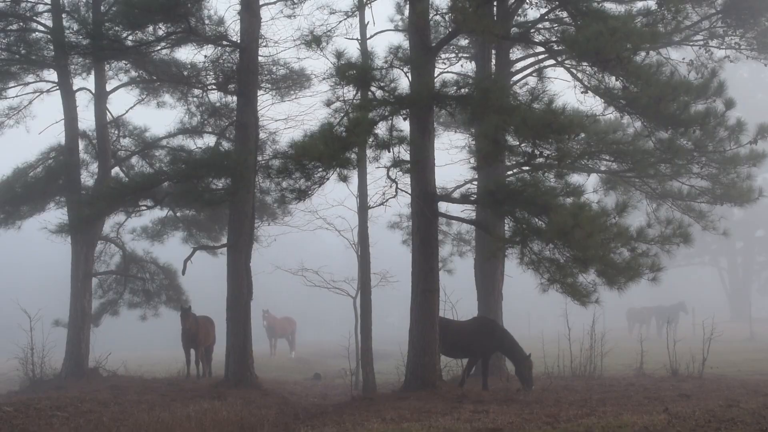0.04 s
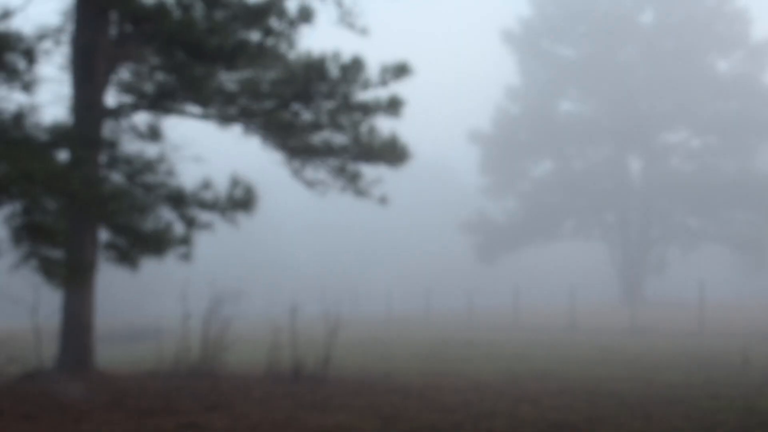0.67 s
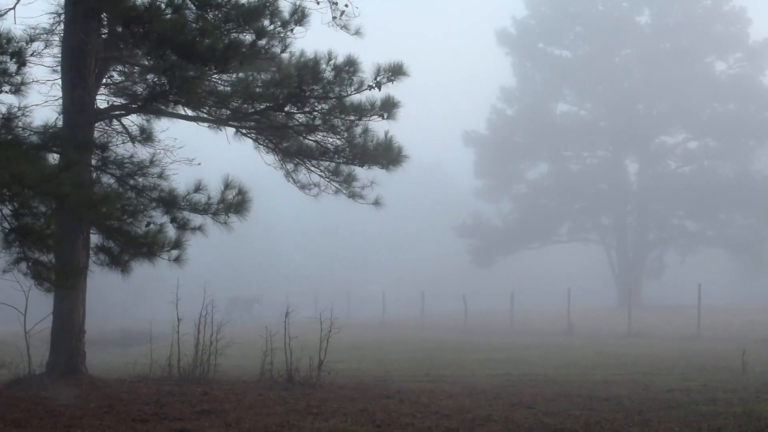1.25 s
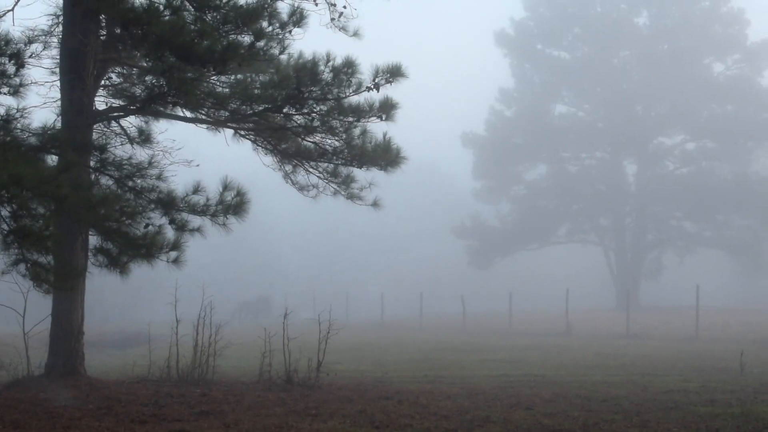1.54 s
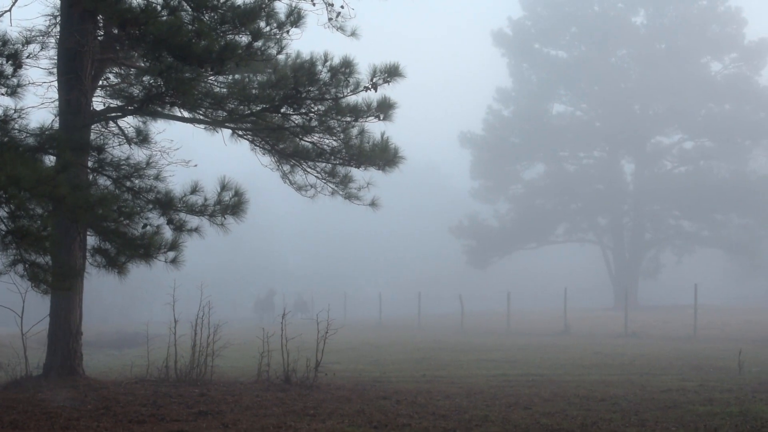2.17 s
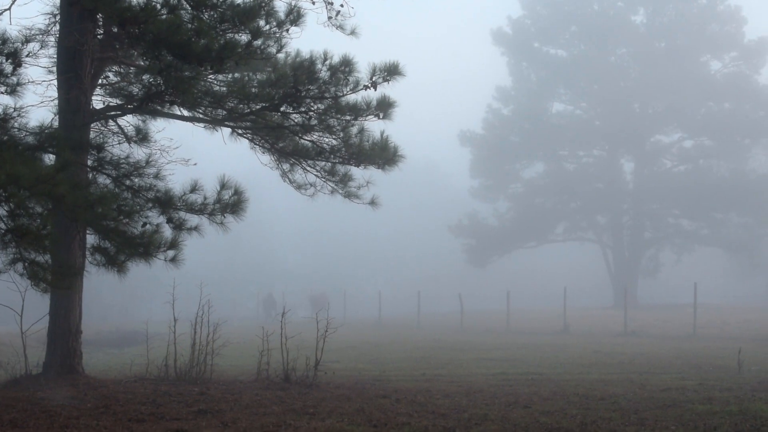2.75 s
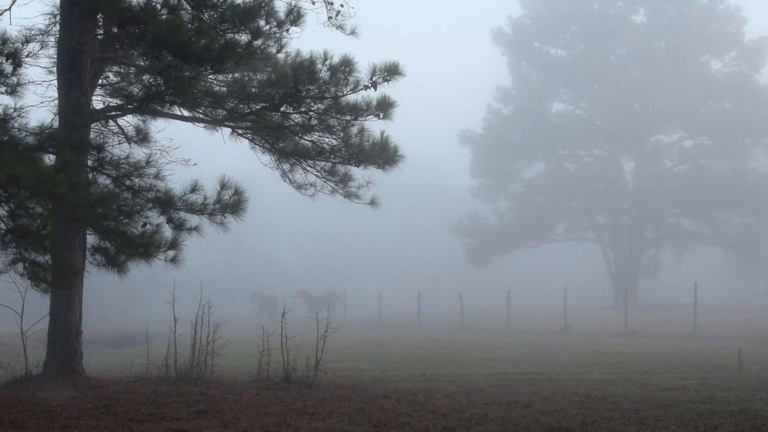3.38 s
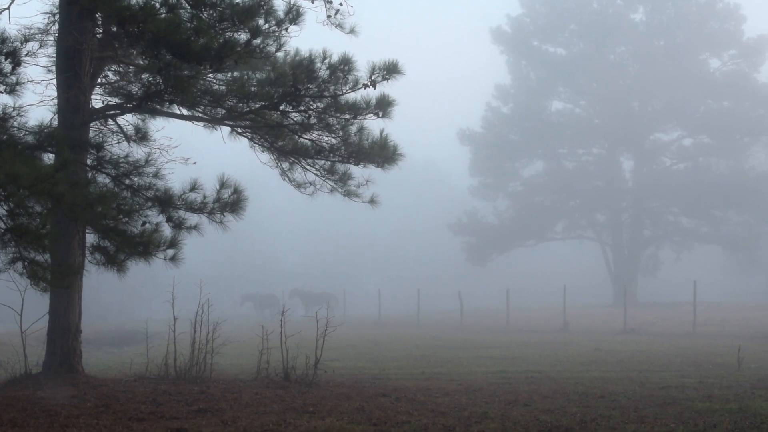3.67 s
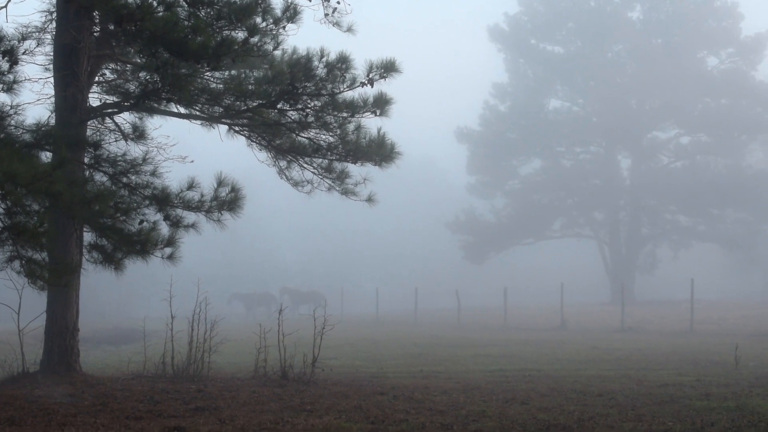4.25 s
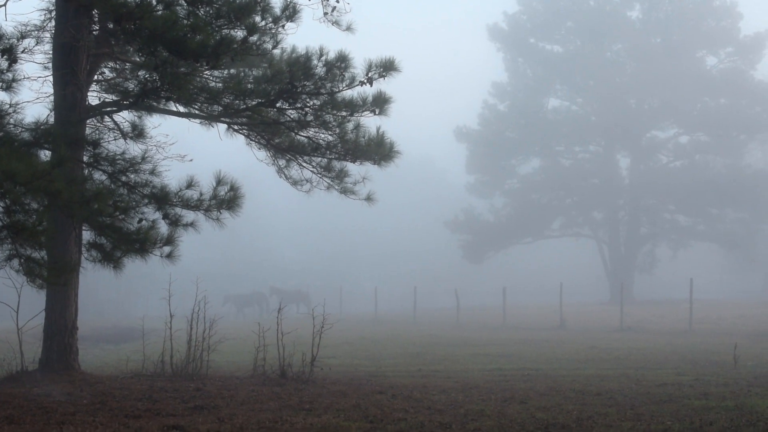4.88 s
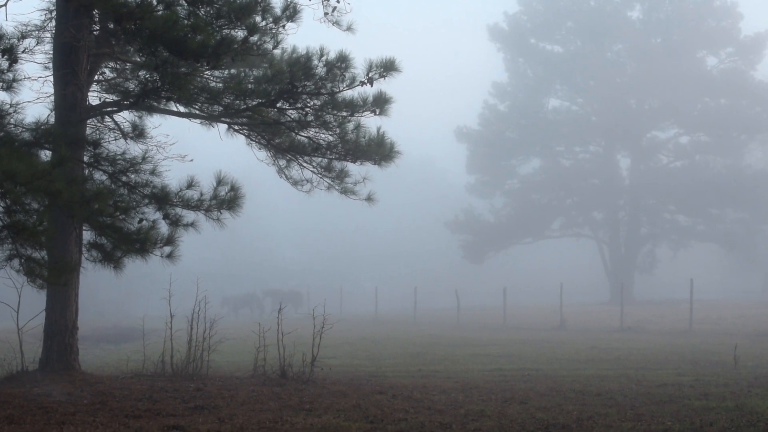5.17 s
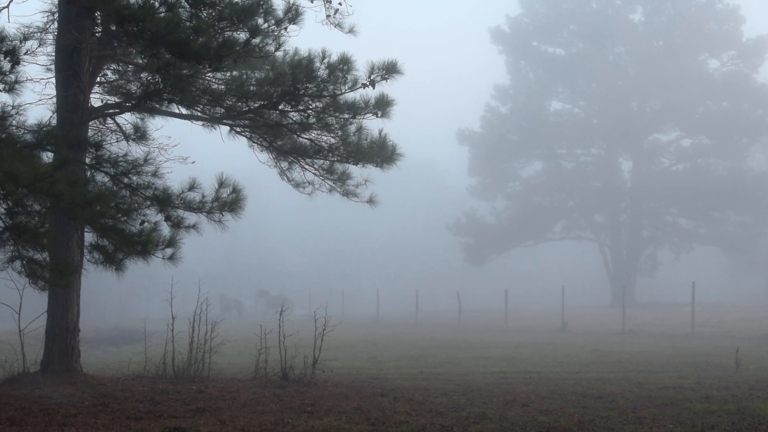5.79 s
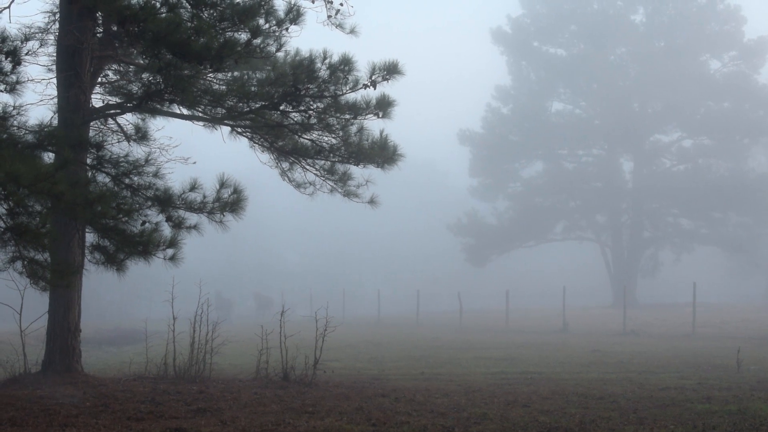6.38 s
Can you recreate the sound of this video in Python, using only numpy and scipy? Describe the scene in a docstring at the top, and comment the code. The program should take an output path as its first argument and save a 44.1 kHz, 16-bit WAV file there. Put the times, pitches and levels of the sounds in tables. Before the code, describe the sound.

In a quiet open field, faint distant birdsong and quick high chirps sound over a steady hush and low rumble. After a bump on the microphone the sound drops out for a moment, then returns with dull handling thumps, soft rustles and faint drip ticks. Then a rooster gives one hoarse four-note crow, the loudest sound, which echoes from the tree line as a faint hiss rises.

```python
"""A low rumble and an even hush lie over a foggy pasture; a songbird whistles far off, small birds chip near.
The camera body is bumped and rings low; at 0.6 s the sound cuts out and fades back in. Soft rustles and
fog drips follow. From 4.4 s a rooster crows, its syrinx pulsing through windpipe, throat and beak: two
short notes, a harsh one, then a held note that cracks to the octave below and sinks. The tree line
echoes it while a faint hiss rises."""
import sys
import numpy as np
from scipy import signal
from scipy.fft import rfft, irfft, next_fast_len
from scipy.io import wavfile
from scipy.ndimage import uniform_filter1d, map_coordinates

SR = 44100
rng = np.random.default_rng(int(sys.argv[2]) if len(sys.argv) > 2 else 0)


def digitize_waveform(pressure):
    """Quantize a signal to 16-bit integers and store it at the path in sys.argv[1].

    Rows of a 2-D input are taken as channels; values are limited to [-1, 1].
    """
    field = np.atleast_2d(pressure).T
    bounded = np.clip(field, -1, 1)
    quanta = np.round(bounded * 32767).astype(np.int16)
    wavfile.write(sys.argv[1], SR, quanta)


N = 283563

# notes of the crow: start t/s, end t/s, roughness of the first catch (0-1), hoarse from t/s,
# hoarseness (0-1), middle and top partials' level/dB relative to the effort
CROW_NOTES = [(4.361, 4.47, .6, 4.53, 0.4, -11.5, -31), (4.475, 4.614, 0.95, 4.46, 0.77, -10, -26.5),
              (4.707, 5.327, 0.06, 4.722, 1, -9.5, -19.5), (5.331, 5.942, 0.44, 5.74, 0.76, -7.5, -19)]


def amp(db):
    """Decibels to amplitude ratio."""
    return 10 ** (np.asarray(db) / 20)


def unit(x):
    """Normalisation to rms 1."""
    return x / np.sqrt(np.mean(x ** 2) + 1e-20)


def steady(x, size):
    """Division by the running rms flattens the envelope."""
    power = uniform_filter1d(uniform_filter1d(x ** 2, size), size)
    return x / np.sqrt(np.abs(power) + 1e-12)


def along(points, hz):
    """Interpolation of (f/Hz, value) points on a log frequency axis."""
    f, v = np.transpose(points)
    return np.interp(np.log(hz + 1), np.log(f + 1), v)


def curve(points):
    """Linear interpolation of (t/s, value) points at every sample."""
    return np.interp(np.arange(N) / SR, *np.transpose(points))


def ramp(start, length):
    """Linear rise from 0 to 1 over length seconds."""
    return np.clip((np.arange(N) / SR - start) / length, 0, 1)


def decay(start, life):
    """1 until start, then exponential decay with a time constant of life seconds."""
    return np.exp(-np.maximum(np.arange(N) / SR - start, 0) / life)


def wobble(rate):
    """Smooth random modulation, rate knots a second."""
    return map_coordinates(rng.standard_normal(N // 8), [np.arange(N) * rate / SR], mode="wrap")


def add(track, s, x):
    """Superposition of x on the track at time s."""
    part = track[max(round(s * SR), 0):][:len(x)]
    part += x[:len(part)]


def filtered(x, response):
    """Linear filtering: the spectrum times a frequency response."""
    m = next_fast_len(N + SR // 2)
    return irfft(rfft(x, m) * response(np.fft.rfftfreq(m, 1 / SR)), m)[:N]


def lowpass(x, hz, order):
    """Zero-phase roll-off above hz."""
    return filtered(x, lambda f: 1 / (1 + (f / hz) ** order))


def coloured(x, points):
    """Spectral shaping by (f/Hz, level/dB) points."""
    return filtered(x, lambda hz: amp(along(points, hz)))


def noise(spectrum):
    """Spectrally shaped Gaussian noise of rms 1."""
    return unit(coloured(rng.standard_normal(N), spectrum))


def scatter(x, t60):
    """Multiple scattering by trunks and foliage smears x into a dense exponential tail."""
    t = np.arange(SR) / SR
    tail = rng.standard_normal(SR) * amp(-60 * t / t60)
    return signal.fftconvolve(x, tail / np.linalg.norm(tail))[:N]


CUT_S = 0.6134  # the sound cuts out here; the rumble is weaker before it


def countryside():
    """Broadband noise, slowly modulated: a far rumble and the field's hush; a high hiss rises late."""
    # spectra of the rumble and of the open field: f/Hz, relative level/dB
    rumble_spectrum = [(15, -24), (40, -9), (52, -8), (64, 1), (88, 0), (104, -5), (135, -5), (170, -14),
                       (300, -21), (700, -60)]
    field_spectrum = [(88, -32), (150, -2), (285, -3.5), (436, -4), (1400, -11), (2270, -11.5),
                      (3280, -15.5), (5760, -21.5), (6860, -23), (8010, -25), (15500, -37)]
    rumble_db = np.where(np.arange(N) / SR < CUT_S, -57.5, -54.5)
    rumble = noise(rumble_spectrum) * amp(rumble_db + 0.33 * wobble(5.38))
    hush = noise(field_spectrum) * amp(-57.5 + 1.1 * wobble(3.69))
    hiss = noise([(3000, -10), (9000, 4), (14000, -3), (16000, -17)])
    return rumble + hush + amp(-70.5) * ramp(start=5.6, length=.3) * hiss


def whistles(notes, waver):
    """Frequency modulation: each pure tone glides through three pitches under a smooth swell."""
    track, unsteady = np.zeros(N), 1 + waver * wobble(180)
    for s, length, start, middle, end, db in notes:
        u = np.linspace(0, 1, int(length * SR))
        glide = np.polyval(np.polyfit([0, .5, 1], [start, middle, end], 2), u)
        hz = glide * np.roll(unsteady, -int(s * SR))[:len(u)]
        swell = np.sqrt(2 * np.abs(np.sin(np.pi * u)))
        add(track, s, amp(db) * swell * np.sin(2 * np.pi * np.cumsum(hz) / SR))
    return track


def twitter(start, end, centre_hz, db, count):
    """A random process of faint whistles from farther birds, log-normal in pitch."""
    when, length, level = rng.random((count, 3)).T
    spread = .1 * rng.standard_normal((count, 1)) + .07 * rng.standard_normal((count, 3))
    onsets = start + (end - start) * when
    notes = [onsets, 0.0288 + 0.062 * length, centre_hz * np.exp(spread), db - 6 * level]
    return whistles(np.column_stack(notes), waver=0.0343)


def far_birds():
    """At a distance, scattered song is nearly as strong as the direct sound."""
    # the songbird's clearest notes: t/s, length/s, f/Hz, glide as a share of f, level/dB
    song = [(0.032, 0.075, 4140, 0.16, -63), (.31, .08, 3000, -.25, -71), (1.751, 0.081, 2600, .3, -72),
            (1.834, .15, 2270, -0.1, -68), (1.959, 0.025, 2570, .1, -65), (1.996, 0.032, 3100, -0.22, -62),
            (2.088, 0.23, 2250, .02, -75), (2.3, 0.12, 2920, -.16, -68), (2.405, 0.035, 2410, 0.053, -62),
            (2.465, 0.16, 2660, -.13, -65.5), (2.975, 0.13, 3160, -.25, -59.5),
            (3.183, 0.033, 4000, 0.18, -63), (3.303, 0.034, 4270, -.13, -63.5),
            (3.326, 0.11, 2890, -0.24, -65.5), (3.9, 0.21, 2224, -.02, -65)]
    notes = [(s, length, hz * (1 - glide / 2), hz, hz * (1 + glide / 2), db)
             for s, length, hz, glide, db in song]
    direct = whistles(notes, waver=0.0283)
    direct += twitter(0, .45, centre_hz=3140, db=-66.5, count=10)
    direct += twitter(2.0, 4.15, centre_hz=2663, db=-65.5, count=40)
    return direct + amp(-1.5) * scatter(direct, t60=0.75)


def handling():
    """Impacts excite damped low modes of the camera body, with rubbing noise and one dry tick."""
    # bumps: t/s, level/dB, f/Hz, t60/s
    impacts = [(.484, -34, 133, .044), (1.111, -50, 308, 0.077), (1.393, -42, 126, 0.12),
               (1.455, -41.5, 106.5, 0.22), (1.598, -45, 101, 0.087), (1.896, -39, 133.6, 0.29),
               (2.011, -36, 169, 0.072), (2.031, -35, 113.6, .13), (2.263, -40, 93.4, .11),
               (3.438, -48, 135, 0.13), (6.196, -36.5, 108.6, .11)]
    # the tick: t/s, level/dB before shaping
    tick_bursts = [(0.4828, -31.5)]
    # its shaping: f/Hz, gain/dB
    tick_spectrum = [(300, -26), (1400, 3.5), (2300, -14), (3500, 2), (5200, -26), (11000, -28),
                     (16000, -47)]
    bumps, ticks, t = np.zeros(N), np.zeros(N), np.arange(SR // 3) / SR
    attack = 1 - np.exp(-t / 0.0019)
    for s, db, hz, t60 in impacts:
        add(bumps, s, amp(db - 60 * t / t60) * attack * np.sin(2 * np.pi * hz * t))
    rub = np.abs(bumps) * noise([(80, 10), (250, 2), (600, -20), (2000, -35), (8000, -74)])
    for s, db in tick_bursts:
        add(ticks, s, amp(db - 60 * t / 0.027) * rng.standard_normal(len(t)))
    return bumps + 0.69 * rub + coloured(ticks, tick_spectrum)


def near_birds():
    """Close to the source, the direct sound of each quick chip outweighs its scattering."""
    # chips: t/s, kind, length/s, level/dB
    chips = [(0.82, "fall", 0.02, -60.5), (1, "rise", 0.047, -68), (1.083, "rise", 0.028, -63.5),
             (1.219, "hook", 0.069, -56), (1.875, "snap", .011, -51), (2.069, "rise", 0.019, -60.5),
             (2.44, "hook", 0.035, -56), (2.568, "fall", 0.02, -63), (3.417, "rise", 0.016, -54),
             (3.473, "flick", 0.012, -53), (3.801, "snap", 0.0092, -44), (4.28, "rise", 0.038, -64),
             (4.656, "rise", .03, -63), (5.537, "snap", 0.0097, -41), (6.309, "rise", .04, -64.5),
             (6.316, "fall", .016, -64)]
    # glide of each kind: start, middle and end f/Hz
    glides = {"rise": (6300, 7550, 7800), "hook": (9700, 7400, 8500), "snap": (6900, 6750, 2600),
              "fall": (5850, 5100, 4000), "flick": (3300, 4200, 5760)}
    direct = whistles([(s, length, *glides[kind], db) for s, kind, length, db in chips], waver=0.0071)
    return direct + amp(-4.5) * scatter(direct, t60=0.28)


def rustles():
    """Amplitude modulation: low noise swells and sinks in half-sine arcs."""
    # swells: t/s, length/s, level/dB
    swells = [(1.071, 0.13, -56), (1.33, 0.36, -60.5), (3.278, 0.34, -56.5)]
    # rustle spectrum: f/Hz, relative level/dB
    spectrum = [(60, -14), (150, 2.5), (330, -2), (600, -32), (2000, -43)]
    return sum(amp(db) * np.sin(np.pi * ramp(s, length)) for s, length, db in swells) * noise(spectrum)


def drips():
    """Impact transients: fog dripping from the needles makes thin high ticks."""
    # single drops: t/s, level/dB before the high-pass
    drops = [(1.077, -51), (1.2007, -53), (1.3977, -51.5), (1.4356, -52), (5.0875, -44)]
    track, t = np.zeros(N), np.arange(SR // 50) / SR
    for s, db in drops:
        add(track, s, amp(db - 60 * t / .008) * rng.standard_normal(len(t)))
    return track - lowpass(track, 6500, order=4)


def voicing():
    """Nonlinear vibration: notes catch, then turn hoarse; hoarseness and the crack double the period."""
    clear_roughness, blend_s = .09, 0.014
    notes = np.array(CROW_NOTES)
    current = np.maximum(np.searchsorted(notes[:, 0], np.arange(N) / SR) - 1, 0)
    start, _, catch, hoarse_at, hoarseness, middle_db, top_db = notes[current].T
    rough = clear_roughness + catch * decay(start, .014) + hoarseness * (1 - decay(hoarse_at, .075))
    crack = ramp(start=5.555, length=0.017)
    doubling = np.clip(0.5 * rough + crack, 0, 1)
    return uniform_filter1d(np.array([rough, doubling, middle_db, top_db]), int(blend_s * SR))


def syrinx(pitch, rough, doubling, jitter, wander, shimmer, rasp):
    """A pulse train, irregular when rough; weakening every second pulse adds the octave below."""
    rough = np.clip(rough, 0, 1.3)
    unsteady = rough * (jitter * wobble(520) + wander * wobble(55)) + .0036 * wobble(160)
    phase = 2 * np.pi * np.cumsum(pitch * (1 + unsteady)) / SR
    pulses = unit(sum(np.cos(k * phase) / np.hypot(1, k / 7) for k in range(1, 23)))
    sizes = 1 + doubling * np.cos(phase / 2) + shimmer * rough * wobble(480)
    hiss = rng.standard_normal(N) * (1 + np.cos(phase))  # air escapes once a cycle
    return pulses * sizes + rasp * (rough + 0.2) * hiss


def windpipe(x, round_trip_s, reflection, dispersion):
    """Reflections along the windpipe ripple the overtones; dispersion draws each puff out in time."""
    def response(hz):
        ripple = 1 + reflection * np.clip(hz / 2000 - 1, 0, 1) * np.cos(2 * np.pi * hz * round_trip_s)
        return ripple * np.exp(-2j * np.pi * dispersion * np.sqrt(hz))
    return filtered(x, response)


def throat(x):
    """Formant filtering: throat and beak move between a strained and an open shape."""
    # responses of the two shapes: f/Hz, gain/dB
    strained = [(300, -42.5), (560, -10.5), (790, -16.5), (930, -17.5), (1130, -0.5), (1380, 3), (1560, -8),
                (1730, -16.5), (1970, 3.5), (2420, -30.5), (2770, -5.5), (3200, -17), (3650, 0),
                (4300, -12), (6500, -19.5), (7000, -31), (8700, -33), (15000, -48.5)]
    opened = [(300, -30.5), (720, -13), (900, -9.5), (1130, -6), (1370, 13.5), (1500, -7), (1650, -40),
              (2000, -28), (2230, -23.5), (2660, -3.5), (3050, -13.5), (3450, -32.5), (3850, -16.5),
              (5000, -32.5), (8500, -23), (15000, -61)]
    # throat opening: t/s, share (0 strained, 1 open)
    openings = [(4.37, 0.61), (4.52, 0.71), (4.60, .19), (4.72, .02), (5.31, 0.14), (5.36, .01),
                (5.43, 0.8), (5.76, 0.84), (5.9, 0.73)]
    opening = curve(openings)
    return (1 - opening) * coloured(x, strained) + opening * coloured(x, opened)


def rooster():
    """Source and filter: effort sets the level; a clear second partial blares at the beak's resonance."""
    # pitch of the two short notes, the harsh note and the held note: t/s, f/Hz
    short_pitch = [(4.365, 517), (4.39, 551), (4.462, 572), (4.492, 668.6), (4.54, 682.7), (4.59, 662.2)]
    harsh_pitch = [(4.719, 679), (4.731, 793.6), (4.755, 828.7), (4.785, 780), (4.812, 684.6), (4.872, 705),
                   (4.93, 780.3), (5.12, 747.8), (5.21, 686)]
    held_pitch = [(5.38, 663), (5.419, 677.3), (5.506, 683.8), (5.555, 712.4), (5.591, 750), (5.66, 763.4),
                  (5.83, 743), (5.9, 725.4), (5.955, 546)]
    # vocal effort: t/s, level/dB
    effort = [(4.365, -39.5), (4.4, -39), (4.52, -35), (4.6, -35.5), (4.73, -32.5), (4.81, -31.5),
              (4.85, -35.5), (4.97, -31), (5.12, -31.5), (5.3, -33.5), (5.37, -38.5), (5.44, -34),
              (5.58, -38), (5.76, -40), (5.93, -38)]
    beak_hz, beak_width_hz, beak_db = 1362.5, 23, 12.5
    attack_s, release_s, uneven_db = 0.015, 0.024, 2
    pitch = curve(short_pitch + harsh_pitch + held_pitch)
    rough, doubling, middle_db, top_db = voicing()
    pulses = syrinx(pitch, rough, doubling, jitter=.045, wander=.018, shimmer=.7, rasp=.55)
    voice = throat(windpipe(pulses, round_trip_s=.001125, reflection=.5, dispersion=.3))
    body = lowpass(voice, 2070, order=14)
    # short waves glance off grass and twigs, so overtones come unevenly
    upper = voice - body + .45 * scatter(voice - body, t60=.07)
    middle = lowpass(upper, 4580, order=16)
    top = upper - middle + scatter(upper - middle, t60=.1) * (1 + .8 * wobble(140))
    resonance = np.exp(-((2 * pitch - beak_hz) / beak_width_hz) ** 2)
    clarity = np.clip(1 - rough ** 2, 0, 1)
    bands = amp(beak_db * resonance * clarity) * steady(body, size=600)
    bands += amp(middle_db + uneven_db * wobble(22)) * steady(middle, size=600)
    bands += amp(top_db) * steady(top, size=600)
    envelopes = [ramp(start, attack_s) * decay(end, release_s) for start, end, *_ in CROW_NOTES]
    return np.max(envelopes, axis=0) * amp(curve(effort)) * bands


def tree_line(x, tail_db, dull_hz):
    """Reflection from groups of trees gives dull echoes; the woods behind add faint reverberation."""
    # echoes: delay t/s, relative level/dB
    trees = [(0.066, -7.5), (.13, -12.5), (.42, -23), (.84, -26.5), (.98, -21)]
    # reverberation time of the woods: f/Hz, t60/s
    decay_times = [(300, 1.8), (1400, 2.2), (2600, 1.2), (4000, 2.6), (9000, 1.3)]
    echoes, dull = np.zeros(N), lowpass(x, dull_hz, order=3)
    for delay, db in trees:
        add(echoes, delay, amp(db) * scatter(dull, t60=0.067))
    hz, t, spectra = signal.stft(rng.standard_normal(2 * SR), SR, nperseg=256)
    spectra *= amp(-60 * t / along(decay_times, hz)[:, None])
    _, tail = signal.istft(spectra, SR, nperseg=256)
    return echoes + amp(tail_db) * signal.fftconvolve(x, tail / np.linalg.norm(tail))[:N]


def scene():
    """Superposition of all sources at one point."""
    pasture = countryside() + far_birds() + handling() + near_birds() + rustles() + drips()
    crow = rooster()
    return (pasture + crow + tree_line(crow, tail_db=-15.5, dull_hz=2640))[None]


def record(dry):
    """Time-varying gain and a band limit: the sound cuts out, then fades back in."""
    cut_db, fall_s, recovery_s, top_hz = -32.5, 0.0068, 0.37, 15700
    fade_db = cut_db * (ramp(CUT_S, fall_s) - ramp(CUT_S, recovery_s))
    return filtered(dry[0] * amp(fade_db), lambda hz: hz < top_hz)[None]


dry = scene()
out = record(dry)
digitize_waveform(out)
```